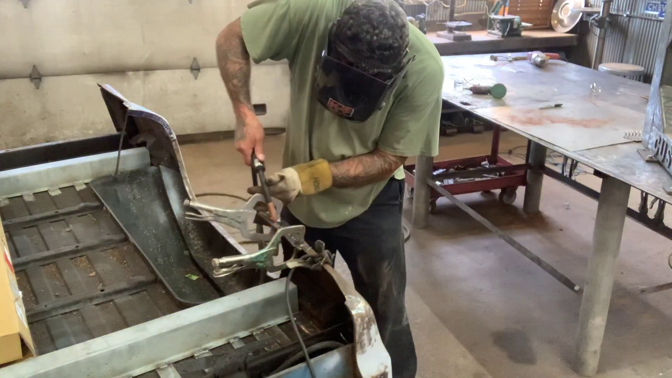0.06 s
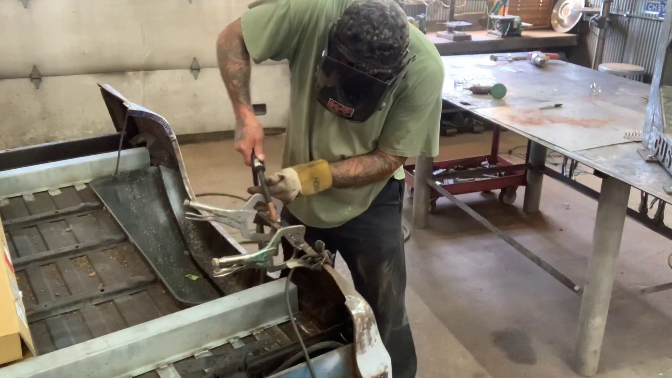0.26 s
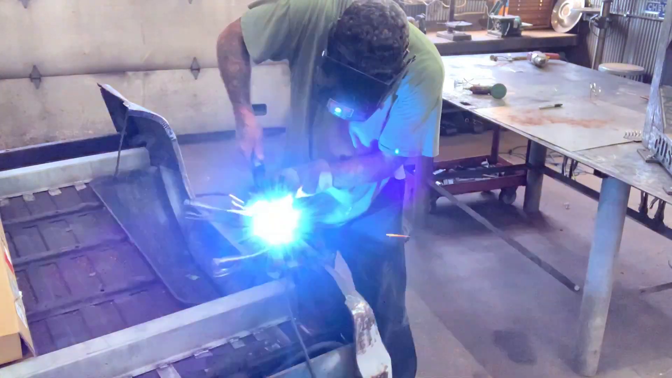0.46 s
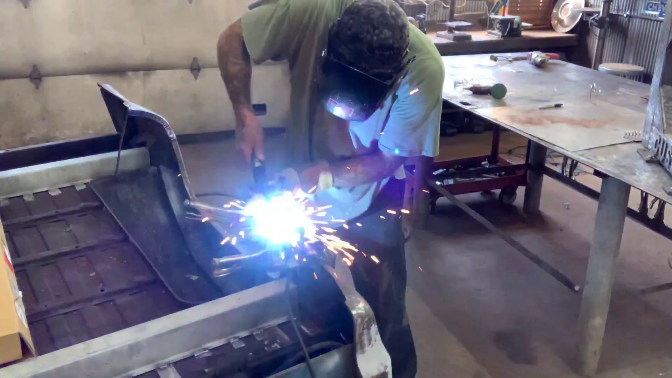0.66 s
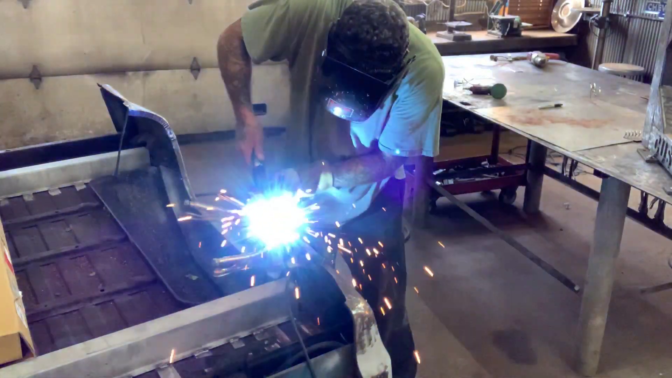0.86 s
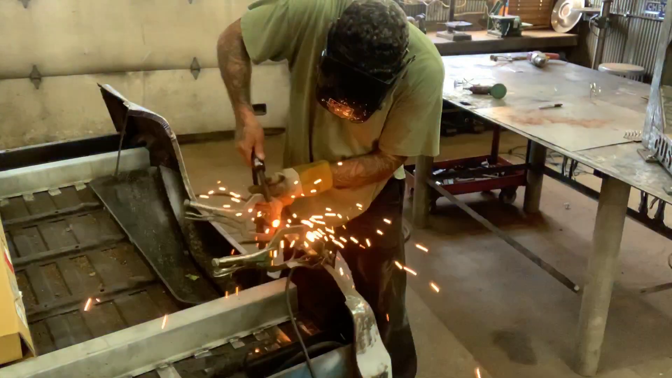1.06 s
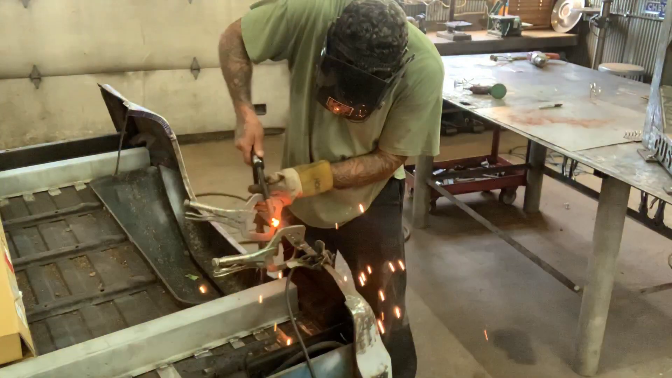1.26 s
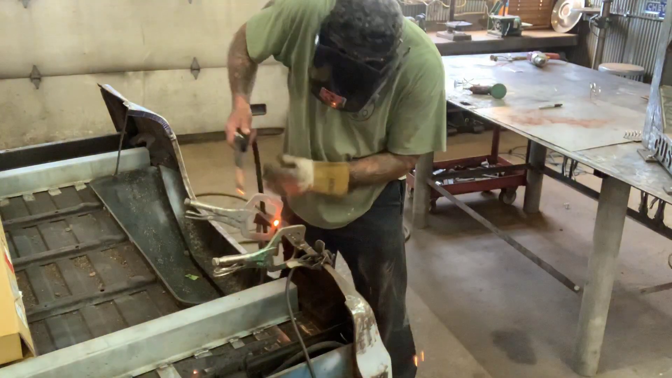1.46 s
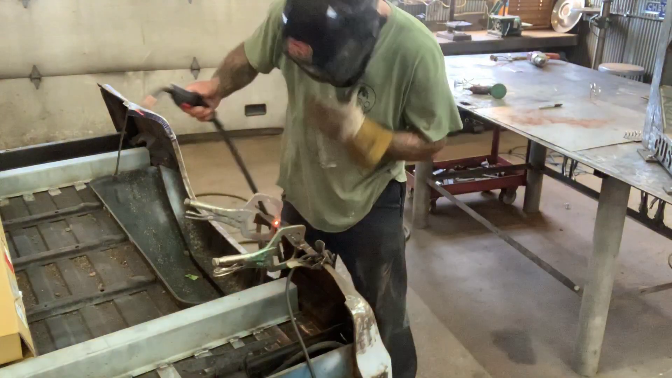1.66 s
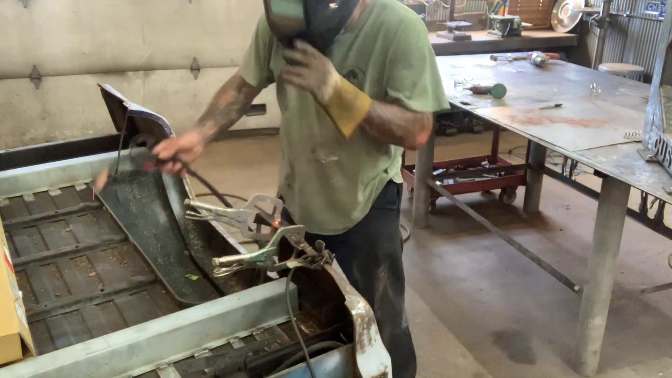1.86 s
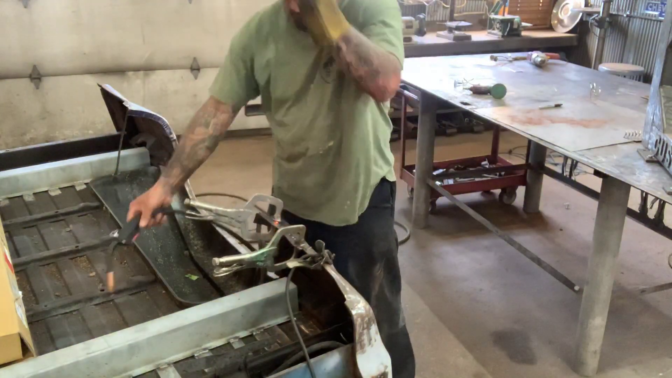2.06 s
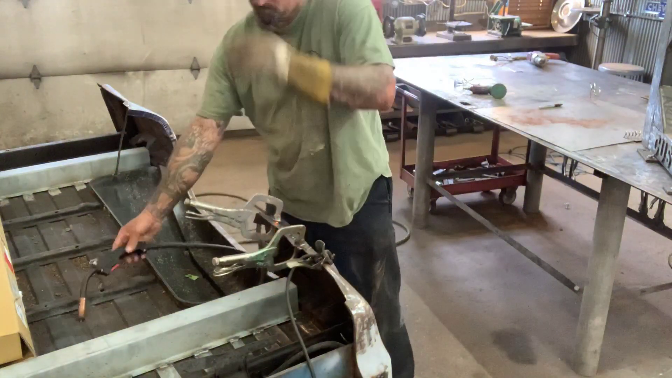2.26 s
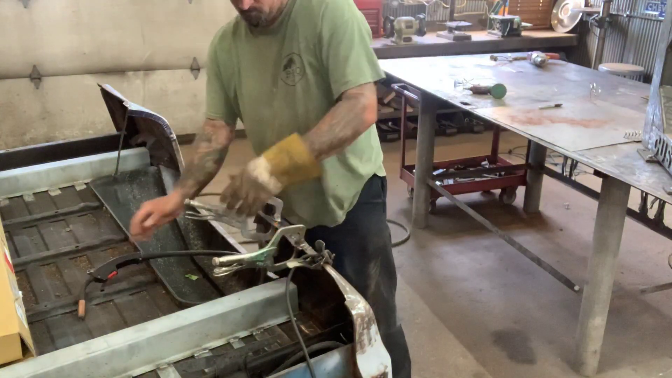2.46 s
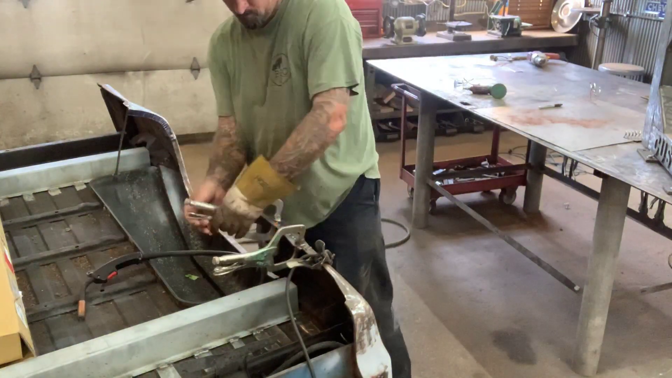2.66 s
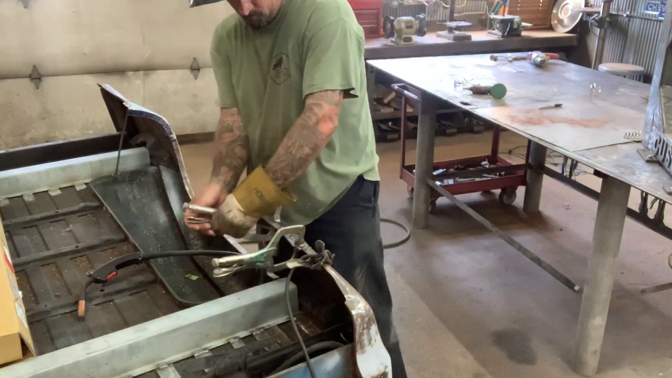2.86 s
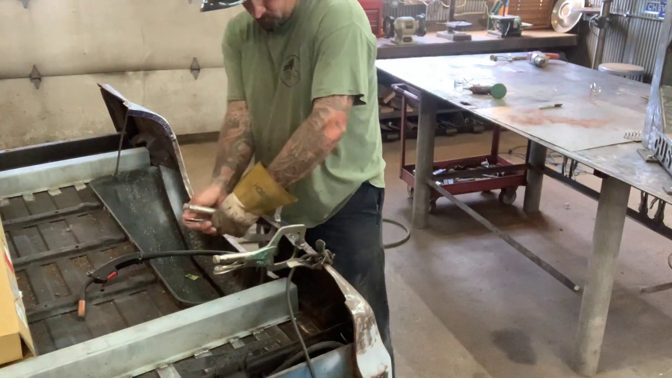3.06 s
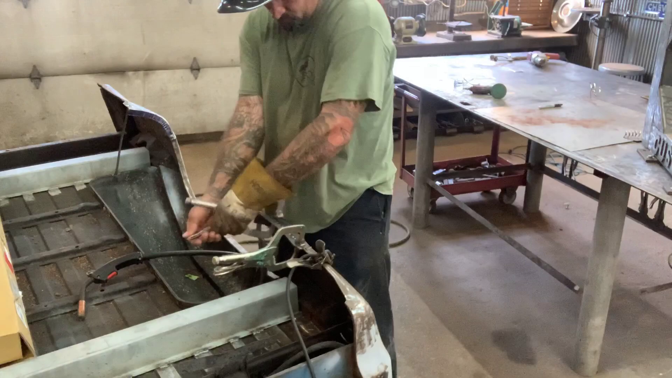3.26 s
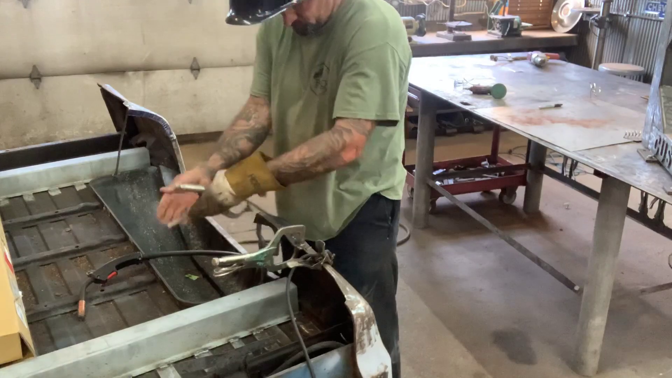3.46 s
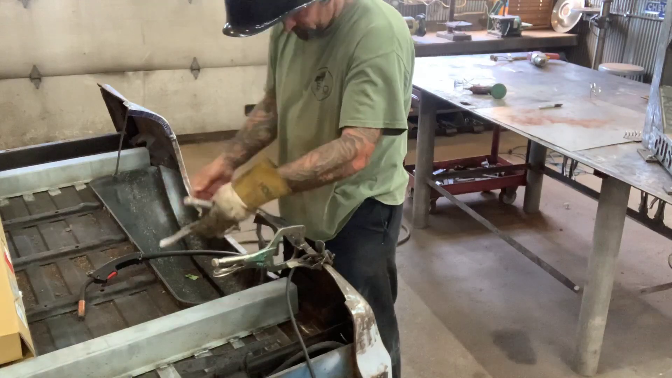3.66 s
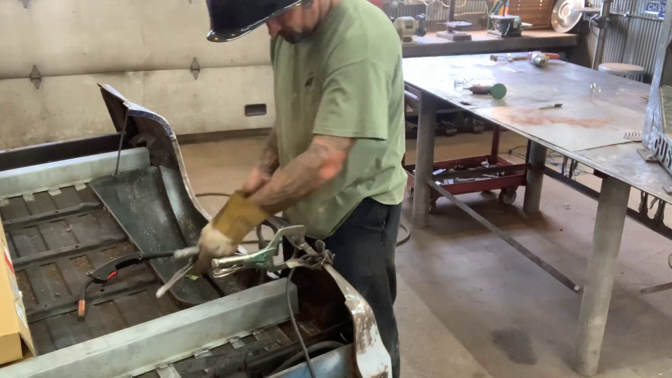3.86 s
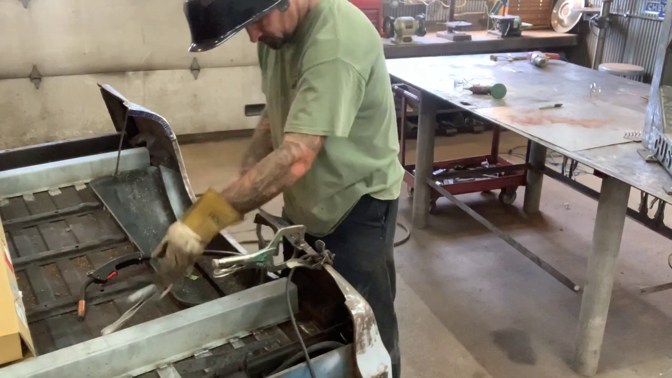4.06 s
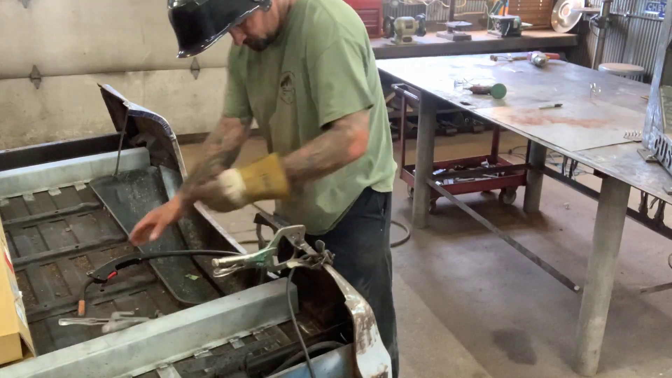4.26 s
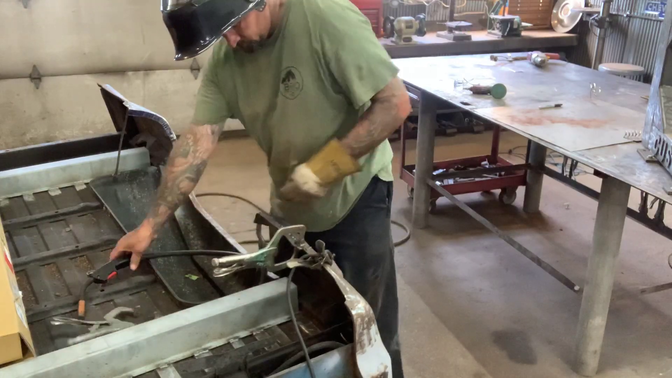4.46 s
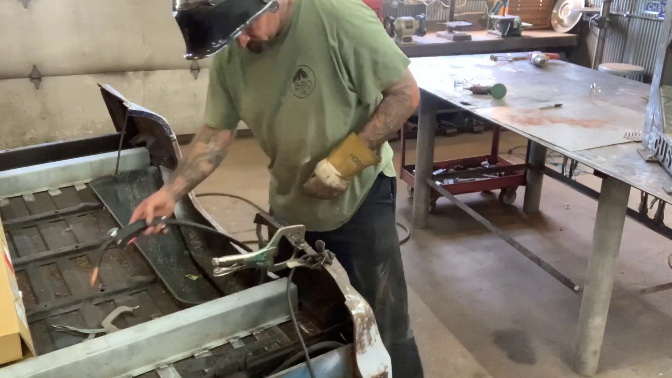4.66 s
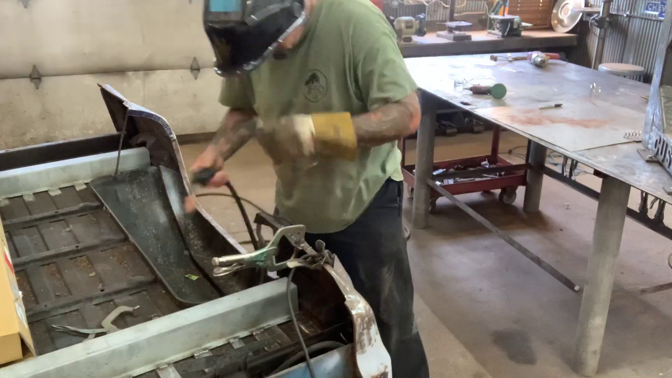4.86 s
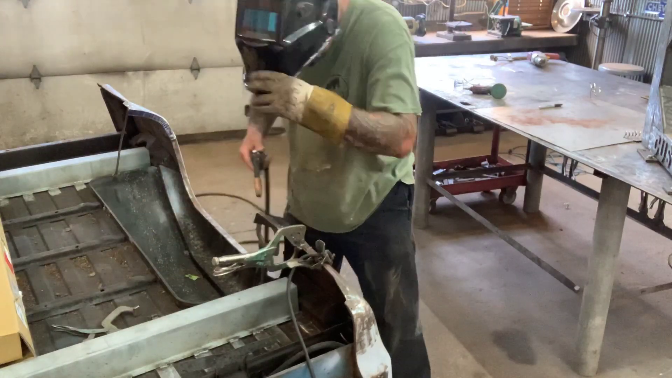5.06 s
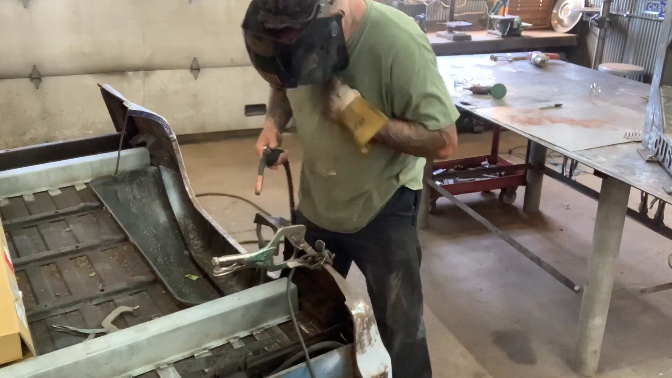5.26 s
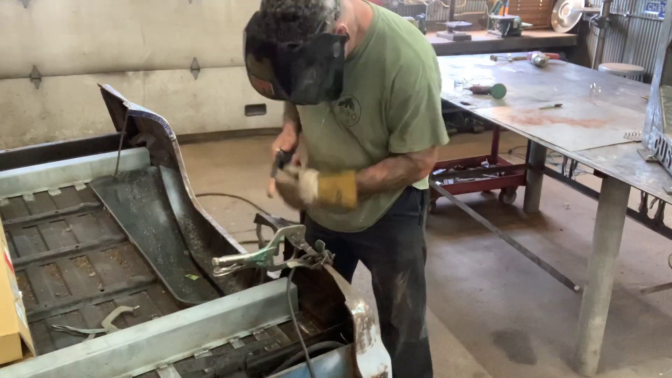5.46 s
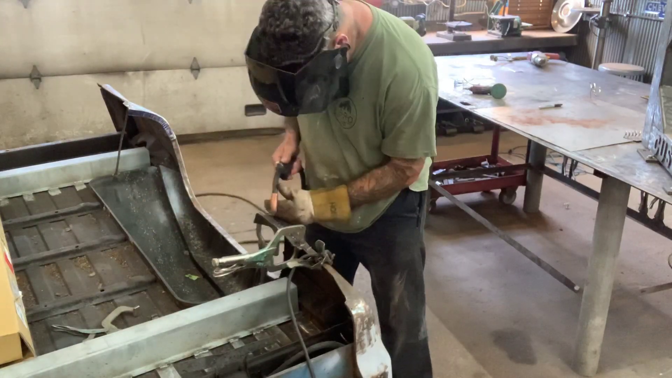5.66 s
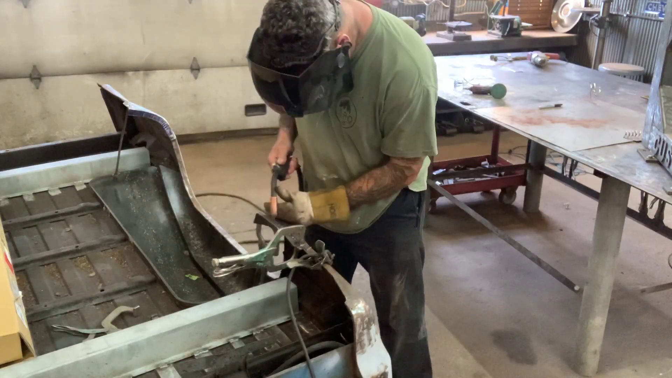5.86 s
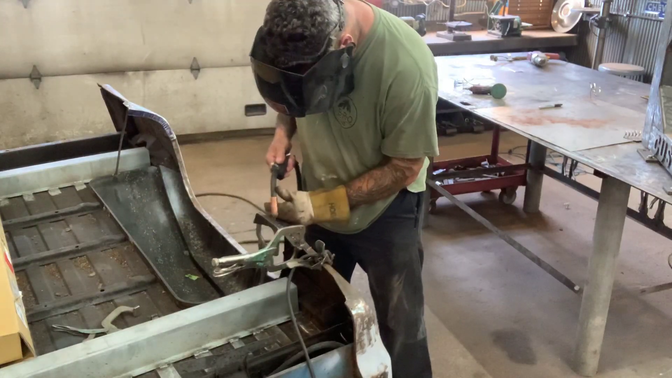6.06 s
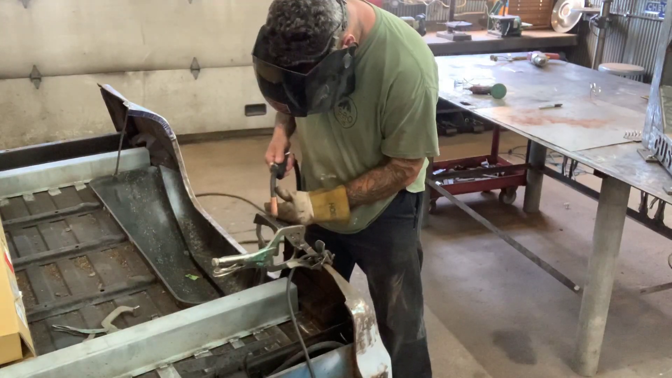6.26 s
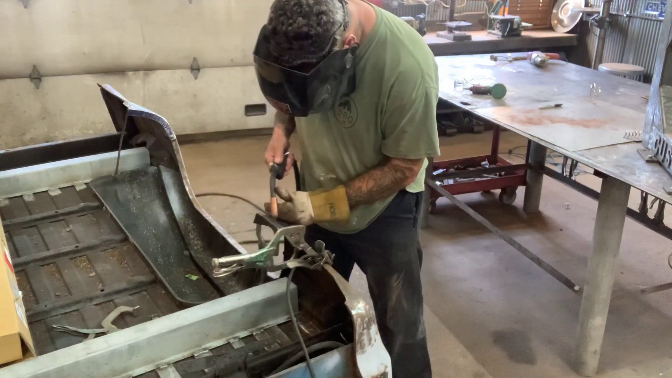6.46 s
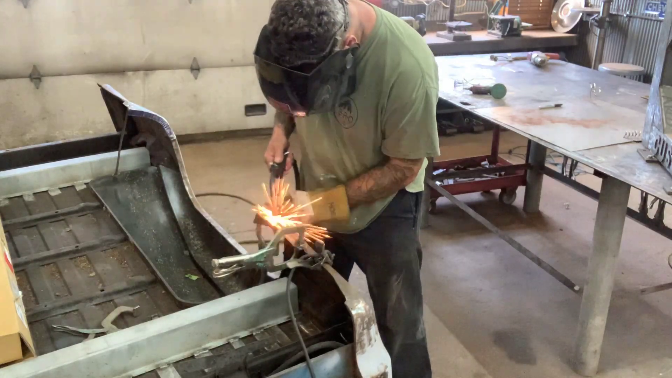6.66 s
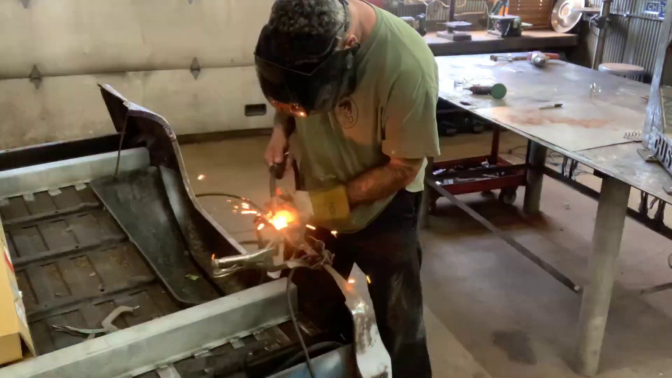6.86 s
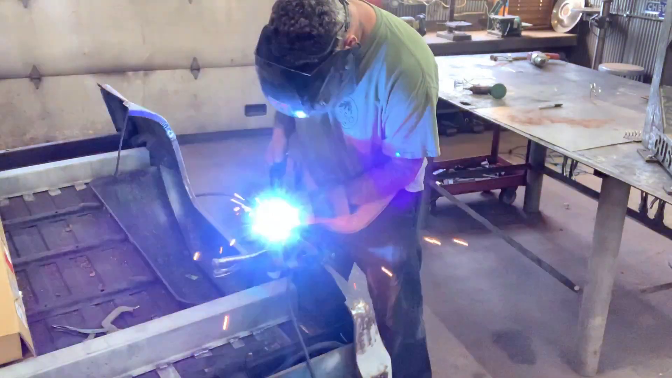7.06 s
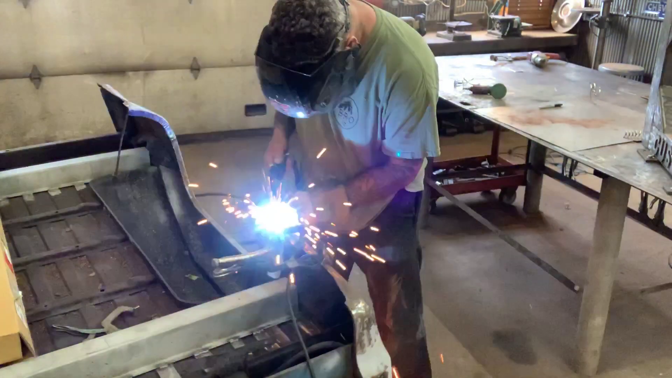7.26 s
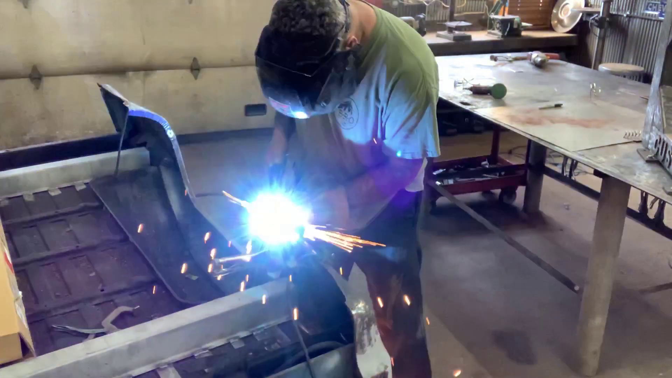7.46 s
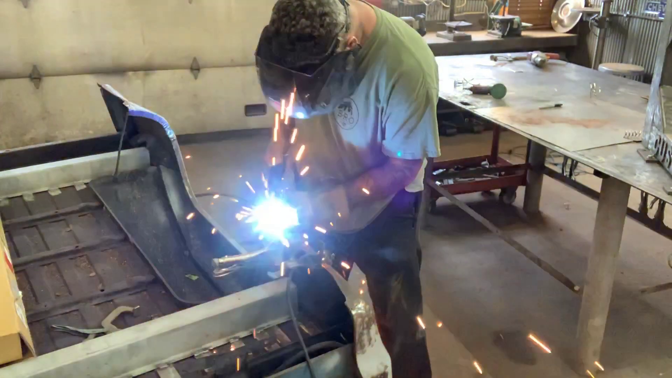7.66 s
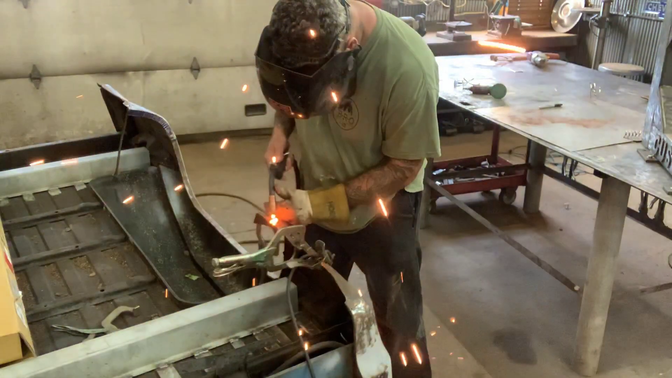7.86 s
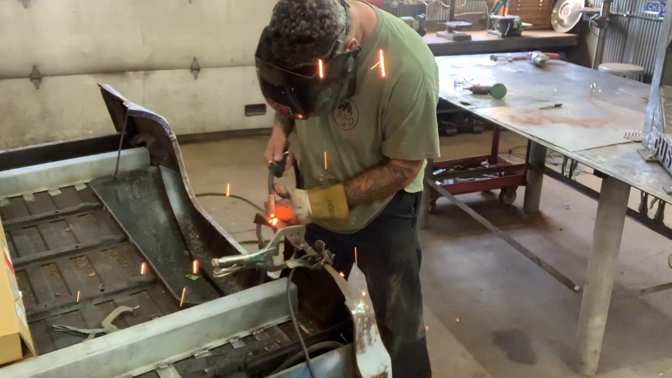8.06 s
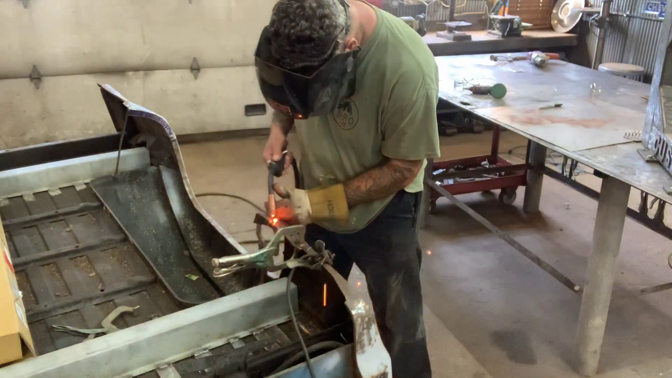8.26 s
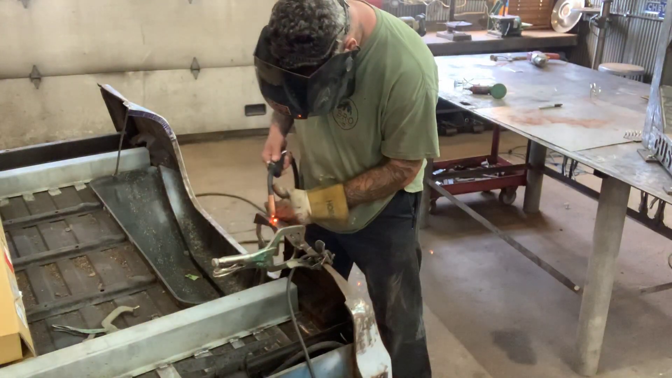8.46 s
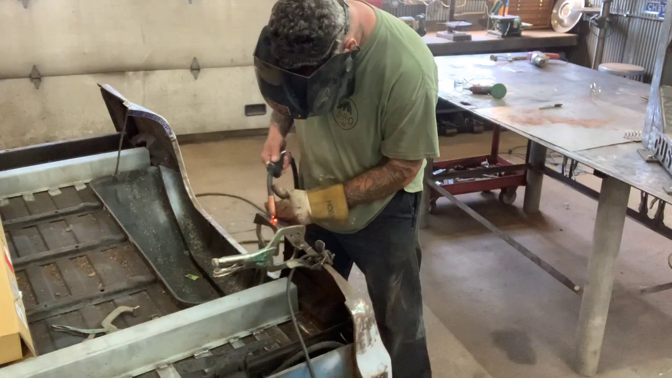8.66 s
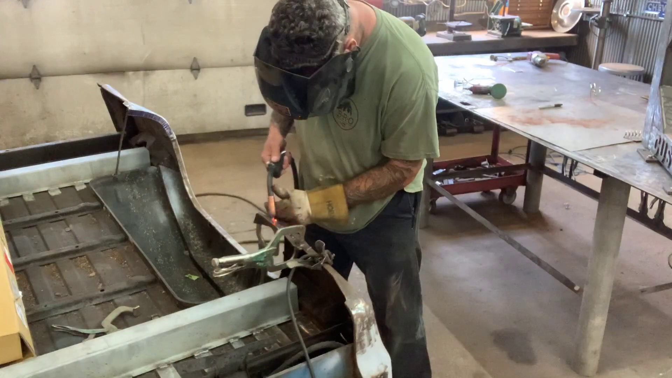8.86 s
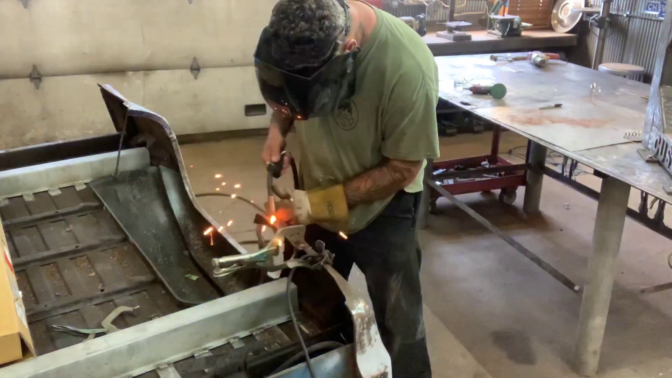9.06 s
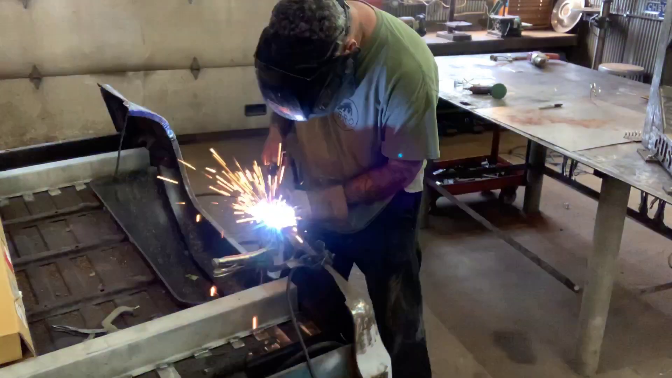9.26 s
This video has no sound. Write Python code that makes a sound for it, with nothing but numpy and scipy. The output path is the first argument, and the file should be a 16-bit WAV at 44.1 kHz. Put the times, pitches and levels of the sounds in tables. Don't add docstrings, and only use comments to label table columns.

```python
import sys
import numpy as np
from scipy import signal
from scipy.fft import rfft, irfft, next_fast_len
from scipy.io import wavfile
from scipy.ndimage import uniform_filter1d, map_coordinates

SR = 44100
rng = np.random.default_rng(int(sys.argv[2]) if len(sys.argv) > 2 else 0)


def volts(x):
    e = np.asarray(x, float) / 20
    return 10 ** e


def to_wav(sig):
    pcm = np.clip(np.atleast_2d(sig), -1, 1) * 32767
    pcm = np.round(pcm).astype(np.int16)
    wavfile.write(sys.argv[1], SR, pcm.T)


N = 411012
T = np.arange(N) / SR

# freq_hz, level_db_per_hz
SWAY_COLOUR = [(15, -49.5), (25, -32), (36, -15), (48, -2.5), (108, 5), (170, -1.5), (220, -29.5),
               (370, -120)]
# peak_s, level_db
SWAY_SWELLS = [(1.0, -70), (1.71, -72), (2.46, -47.5), (3.38, -53.5), (3.9, -64), (4.28, -44), (4.57, -50),
               (4.95, -49), (5.6, -62), (6.1, -66.5), (6.85, -58.5), (7.17, -58.5), (9.09, -64)]
SWAY_STILL_DB = -77.5
# freq_hz, level_db_per_hz
FAN_AIR = [(25, -86.5), (82, -65), (140, -37), (182, -16), (211, -16.5), (245, 0), (318, -21), (349, -24),
           (369, -26.5), (516, -26), (633, -30.5), (748, -27), (1150, -33.5), (12000, -65.5), (15600, -106),
           (22000, -120)]
BLADE_HZ, BLADE_DB, AIR_WOBBLE_DB = 240.5, -52.5, 0.7
# freq_hz, likeness_ratio
FIELD_ALIKE = [(60, 0.97), (300, 0.7), (640, 0.15), (1400, -0.028), (3000, 0.041), (8000, 0.16)]
# freq_hz, t60_s
HALL_DECAY = [(80, 1.3), (400, 2.6), (1100, 1.68), (3000, 1.55), (8000, 1.16), (15000, 0.4)]
HALL_TOP_HZ = 15900

# start_s, peak_db, weight_db, hardness_db, t60_s
TORCH_DROPS = [
    (2.272, -16, -13, 3, 0.32),
    (2.299, -25.5, -11, -5, 0.57),
    (2.455, -26.5, -6, 15.5, 0.23),
    (2.57, -36.5, 1.5, 11, 0.39),
]
# freq_hz, level_db_per_hz
TORCH_BLOW = [(18, -61), (30, -69), (104, -5), (146, -10), (206, -3.5), (455, -17.5), (562, -10.5),
              (1000, -8), (1380, -9), (1490, -10), (4200, -28.5), (5400, -38.5), (8300, -39), (10300, -45),
              (13000, -43.5), (16500, -86.5)]
# start_s, peak_db, weight_db, hardness_db, t60_s
PLIER_DROPS = [(3.14, -41.5, -28, 31.5, .1), (3.152, -26.5, -16.5, -3, 0.48), (3.299, -41.5, -5, 0, 0.4),
               (4.074, -20.5, -41, 9.5, 0.46), (4.153, -8.5, -10, 10.5, 0.21),
               (4.209, -12, -8.5, -11.5, 0.32), (4.297, -11, -25, -18, 0.14),
               (4.465, -22.5, -17, 0.5, 0.18), (4.498, -25.5, -15, -14.5, 1), (4.544, -35, -26, 14.5, .15),
               (4.553, -16, -26, 5, .2), (4.563, -8, -19.5, 2.5, 0.18), (4.574, -11, -25, 1, 0.4),
               (4.659, -21, -27, -2.5, 0.15), (4.719, -23, -23, -12, 0.98)]
# freq_hz, level_db_per_hz
PLIER_BLOW = [(18, -48), (30, -45.5), (109, -12.5), (210, -6.5), (276, -9.5), (340, -2.5), (443, -8.5),
              (519, -8), (1120, -12), (1210, -17.5), (4000, -20), (8750, -24.5), (10500, -29), (13000, -31),
              (14800, -36), (16500, -114)]
# mode_hz, level_db, t60_s
BED_MODES = [(213, -11.5, 0.086), (365, -19, 0.13), (518, -5, 0.15), (770, -24, 0.098), (1191, -12, 0.29),
             (1404, -15.5, 0.42), (2080, -23.5, 0.24), (2740, -16, 0.054), (3530, -8, 0.12),
             (6000, -31.5, .15)]
# freq_hz, likeness_ratio
BED_ALIKE = [(60, 1), (300, 0.61), (640, 0.27), (1400, .2), (4000, .2), (8000, .7), (13000, 0.33)]
LUMPY_DB, MODE_SCATTER_DB = 2, 2.5
# start_s, peak_db, pitch_hz, t60_s
HANDLE_RINGS = [(4.077, -31, 1080, .3), (4.112, -30, 341, .5), (4.156, -24.5, 750, .2),
                (4.16, -22, 1290, .12), (4.297, -21.5, 1050, 0.17), (4.565, -27.5, 1020, 0.066),
                (4.078, -35.5, 2600, 0.33), (4.078, -37, 3390, .2), (4.297, -27.5, 3570, .1),
                (4.467, -33, 3500, .15), (4.575, -22, 4460, 0.13), (4.575, -37.5, 1766, 0.2),
                (4.576, -30, 3980, .1), (4.59, -28, 356, 0.61), (2.275, -28.5, 1270, .1),
                (3.152, -34.5, 1581, .11), (3.154, -42.5, 3240, 0.12), (3.153, -45.5, 6210, .1)]
# start_s, peak_db, crack_hz, width_hz
JAW_TICKS = [
    (3.299, -60.5, 13000, 4000),
    (3.329, -56, 13000, 4000),
    (3.649, -53.5, 6650, 2986),
    (3.776, -45, 9000, 8130),
]
# mode_hz, level_db, t60_s
JAW_MODES = [(11600, -0.5, 0.27), (14400, -12, .25)]

# start_s, peak_db, pitch_hz, t60_s
WIRE_STUBS = [
    (0.855, -29.5, 71, 0.084),
    (6.834, -18.5, 70, 0.036),
    (7.35, -19, 68, 0.044),
]
# valve_open_s, arc_death_s, valve_shut_s, duck_db
WELDS = [
    (0.46, 1.04, 1.92, 8),
    (6.553, 7.72, 8.585, 7),
    (8.796, 9.5, 10.5, 2.5),
]
DUCK_S, RECOVER_S = 0.41, 0.67
# start_s, peak_db, body_db
VALVE_CLICKS = [
    (0.4548, -35, -13.5),
    (1.919, -27.5, -16),
    (6.554, -25.5, -16),
    (8.5849, -26.5, -16),
    (8.795, -29, -17),
]
# delay_s, level_db
PLUNGER_BOUNCES = [(.0006, -1), (.0027, 1), (.005, -9.5)]
# freq_hz, level_db_per_hz
JET_COLOUR = [(880, -20), (1500, -30), (2700, -29.5), (3520, -19.5), (4600, -22), (5400, -12.5), (8940, 1),
              (9590, -4), (10600, 0), (11200, 4.5), (12300, -9), (13900, 1), (15000, -4), (15900, -47)]
FLOW_DB, SURGE_DB, SURGE_S, SHUT_DB_PER_S = -51.5, 14.5, 0.04, 160
# time_s, hiss_db
ARC_HEAT = [
    [(.455, -35.5), (.52, -39.5), (.7, -34.5), (.8, -32), (.9, -35), (1.02, -40), (1.2, -51), (1.4, -80)],
    [(6.6, -46.5), (6.72, -34.5), (6.84, -41.5), (7.06, -39.5), (7.16, -37), (7.3, -43), (7.44, -42),
     (7.72, -39.5), (8.01, -59.5)],
    [(8.84, -54), (8.9, -45), (8.97, -51), (9.08, -49), (9.2, -45), (9.32, -37)],
]
# freq_hz, level_db_per_hz
DRIVE_COLOUR = [(290, -20), (500, -4.5), (542, -37), (715, -3), (835, -34.5), (1150, 1), (1410, 0),
                (1680, -21.5), (3500, -33.5), (4550, -47), (7700, -120)]
FEED_DB, COAST_DB = -63, -62.5
# peak_s, level_db
DRIVE_PUSHES = [(.56, -47), (.8, -63), (6.73, -52), (6.95, -53), (7.16, -46), (7.44, -80), (8.89, -47.5),
                (8.97, -44)]

SECOND_JOINT_S = 4
LEFT_LAG_S = 9 / SR
# freq_hz, phase_rad
PORT_PHASE = [(300, -.4), (1000, -1.7), (2000, -3.6), (4000, -7.3), (5500, -9.6), (6200, -12.1),
              (6900, -13.4), (8000, -15.8), (9000, -17.3), (9650, -15.9), (10300, -16.05), (11000, -17.3),
              (11700, -16.8)]
# freq_hz, difference_db
PORT_BALANCE = [(500, 0), (1000, 3), (3000, 2), (5000, 0), (7000, 0), (8500, -4), (9700, 3.5), (10500, -1),
                (12000, 0)]
GRIT_PER_S, GRIT_DB, GRIT_SPREAD_DB, GRIT_TOP_HZ = 900, 4, 1.5, 14500
# peak_s, level_db
SIZZLES = [(6.829, -31.5), (6.903, -46), (6.973, -43), (7.12, -40.5), (7.344, -41), (7.478, -39.5),
           (7.605, -47), (8.966, -51.5), (9.221, -40)]
# delay_s, level_db
WALL_RETURNS = [(.0168, -22), (.0186, -15), (.0214, -13), (.0226, -19), (.0288, -20), (.0309, -16)]
# freq_hz, level_db
WALL_TILT = [(900, 14), (2500, 18), (4500, 14.5), (6500, 4), (8500, -15), (14000, 0), (15600, -31)]
SHIVER_DB, SHIVER_T60_S = -9, 0.035
# start_s, peak_db, knock_db
LONE_POPS = [(.4635, -16.5, -12), (.47, -17, -17), (.4821, -23, -23), (.5315, -13.5, -15),
             (.7527, -14, -22), (.7628, -14, -22), (6.6812, -12, -17), (6.7625, -18, -20),
             (6.832, -14, -12), (6.904, -24, -21), (6.9753, -11, -18), (7.0282, -13, -20),
             (7.0678, -26, -16), (7.1187, -24, -18), (7.1226, -13, -14), (7.1454, -13, -18),
             (7.2901, -17, -18), (7.3469, -12, -15), (7.481, -13, -15), (7.608, -9, -20),
             (7.6668, -11.5, -22), (7.6989, -9.5, -21), (8.9317, -24, -11), (8.9401, -30, -15),
             (8.9678, -18, -21), (9.0215, -13, -20), (9.0521, -32, -17), (9.1099, -15, -21),
             (9.2231, -13, -14), (9.2915, -19, -18)]
# start_s, peak_db
RUN_1 = [(0.5441, -17.0), (0.5507, -16.0), (0.5563, -16.0), (0.5656, -16.0), (0.5725, -15.0),
         (0.5805, -16.0), (0.5871, -16.0), (0.5925, -15.0), (0.6038, -17.0), (0.6086, -14.0),
         (0.623, -15.0), (0.6298, -17.0), (0.6381, -16.0), (0.6443, -17.0), (0.6527, -16.0),
         (0.6602, -17.0), (0.67, -17.0), (0.6763, -17.0), (0.6842, -16.0), (0.6921, -16.0), (0.7006, -15.0),
         (0.709, -15.0), (0.7175, -13.0), (0.725, -15.0)]
RUN_2 = [(0.784, -15.0), (0.7917, -18.0), (0.8012, -15.0), (0.8105, -17.0), (0.819, -15.0), (0.8299, -12.0),
         (0.8359, -16.0), (0.8417, -16.0), (0.8478, -16.0), (0.8585, -18.0), (0.8643, -17.0),
         (0.8697, -15.0), (0.875, -19.0), (0.882, -17.0), (0.8914, -18.0), (0.8982, -16.0), (0.9094, -19.0),
         (0.9172, -16.0), (0.9267, -18.0), (0.9314, -15.0), (0.9407, -18.0), (0.9467, -13.0),
         (0.9524, -15.0), (0.9571, -22.0), (0.9632, -23.0), (0.9746, -19.0), (0.9805, -20.0),
         (0.9904, -17.0), (0.9991, -22.0), (1.0093, -18.0), (1.0191, -18.0), (1.0294, -17.0),
         (1.041, -22.0)]
RUN_3 = [(7.1627, -11.0), (7.1736, -13.0), (7.1808, -14.0), (7.1883, -12.0), (7.1946, -13.0), (7.2, -11.0),
         (7.2076, -13.0), (7.2154, -15.0), (7.2227, -14.0), (7.2306, -11.0), (7.2399, -11.0),
         (7.2505, -14.0)]
RUN_4 = [(7.5007, -12.0), (7.5104, -13.0), (7.5213, -17.0), (7.5295, -14.0), (7.5373, -16.0),
         (7.5447, -18.0), (7.5516, -20.0), (7.5579, -19.0)]
RUN_5 = [(9.2444, -13.0), (9.2523, -19.0), (9.2637, -13.0), (9.2733, -16.0), (9.2819, -17.0)]
# lift_db, knock_db
RUN_LEVELS = [(5, -24.5), (3.5, -26), (0, -20.5), (-0.5, -19.5), (1, -19.5)]
KNOCK_SCATTER_DB = 1
# freq_hz, level_db_per_hz
SPARK_COLOURS = [
    [(1760, -28.5), (2600, -25.5), (3560, -4.5), (4380, -15.5), (6480, -4.5), (7910, -8), (8870, 1),
     (10400, 3.5), (13900, 0.5), (16000, 2), (16500, -33)],
    [(1760, -45), (3000, -21.5), (3660, -24.5), (3960, -16.5), (6960, -8.5), (8560, 2), (10800, 2.5),
     (11900, -6), (14100, -0.5), (15200, -4.5), (16000, -16), (16500, -31.5)],
]
# delay_s, level_db, top_hz
SPARK_ECHOES = [
    [(.0004, -4, 15870), (.0009, -6.5, 13900), (.0016, -13, 14650), (.003, -18.5, 5000)],
    [(.0012, -19.5, 6000), (.0015, -5.5, 13970), (.0032, -15, 14300)],
]
# share_ratio, t60_s
SPARK_TAILS = [(.45, .0022), (.07, .001)]
# mode_hz, width_hz, level_db
KNOCK_MODES = [
    [(1190, 950, 10.5), (3500, 1600, 3)],
    [(1700, 2150, 6), (4000, 660, -26.5)],
]
# delay_s, level_db
KNOCK_REBOUNDS = [(.0007, -36.5), (.0009, 4.5)]
WELDING_LOW_HZ = 120


def unit(x):
    return x / np.sqrt(np.mean(x ** 2) + 1e-20)


def along(points, hz):
    f, v = np.transpose(points)
    return np.interp(np.log(hz + 1), np.log(f + 1), v)


def curves(rows):
    s, *cols = np.transpose(rows)
    return [np.interp(T, s, c, left=-120, right=-120) for c in cols]


def wobble(rate_hz):
    knots = rng.standard_normal(int(N * rate_hz / SR) + 4)
    return map_coordinates(knots, [T * rate_hz])


def swells(rows, rise_db_per_s, fall_db_per_s):
    power = 0
    for s, db in rows:
        away_db = np.maximum(rise_db_per_s * (s - T), fall_db_per_s * (T - s))
        power = power + volts(db - away_db) ** 2
    return np.sqrt(power)


def filtered(x, response):
    m = next_fast_len(x.shape[-1] + SR // 8)
    return irfft(rfft(x, m) * response(np.fft.rfftfreq(m, 1 / SR)), m)[..., :x.shape[-1]]


def resonances(modes):
    def response(f):
        total = 0
        for k, (hz, width_hz, db) in enumerate(modes):
            loss = 1j * f * width_hz
            total = total + (-1) ** k * volts(db) * loss / (hz * hz - f * f + loss)
        return total
    return response


def causal(spectrum, size=2048):
    level_db = along(spectrum, np.fft.rfftfreq(size, 1 / SR))
    cepstrum = irfft(np.log(volts(level_db) + 1e-6))
    cepstrum[1:size // 2] *= 2
    cepstrum[size // 2 + 1:] = 0
    pulse = irfft(np.exp(rfft(cepstrum)))[:size // 2]
    return pulse / np.abs(pulse).max()


def diffuse(pair, db_at, alike=FIELD_ALIKE):
    def mid_side(hz):
        turn_rad = np.arccos(np.clip(along(alike, hz), -1, 1)) / 2
        return volts(db_at(hz)) * np.array([np.cos(turn_rad), np.sin(turn_rad)])
    mid, side = filtered(pair, mid_side)
    return np.array([mid + side, mid - side])


def dying(t60_at, size):
    hz, t, z = signal.stft(rng.standard_normal((2, size)), SR, nperseg=256)
    decay = volts(-60 * t / t60_at(hz)[:, None])
    return signal.istft(z * decay, SR, nperseg=256)[1][:, :size]


def dull(x, top_hz):
    return filtered(x, lambda hz: 1 / (1 + 1j * hz / top_hz) ** 2)


def from_torch(x):
    sides = np.array([[0.5], [-0.5]])

    def ports(hz):
        lead_rad = 2 * np.pi * hz * LEFT_LAG_S + along(PORT_PHASE, hz)
        return np.exp(-1j * lead_rad * sides) * volts(along(PORT_BALANCE, hz) * sides)
    return filtered(x, ports)


def add(track, s, sound):
    start = round(s * SR)
    part = track[..., start:start + sound.shape[-1]]
    part += sound[..., :part.shape[-1]]


def ducked_db():
    total_db = 0
    for on, dies, _, db in WELDS:
        total_db = total_db - db * np.interp(T, [on, on + DUCK_S, dies, dies + RECOVER_S], [0, 1, 1, 0])
    return total_db


def rumble():
    sway = diffuse(rng.standard_normal((2, N)), lambda hz: along(SWAY_COLOUR, hz))
    swell = swells(SWAY_SWELLS, rise_db_per_s=103, fall_db_per_s=26)
    return volts(3.0) * np.hypot(volts(SWAY_STILL_DB), swell) * unit(sway)


def fan():
    turbulence = 1 + 0.25 * (wobble(24) + 1j * wobble(24))
    tone = turbulence * np.exp(2j * np.pi * BLADE_HZ * T + 0.5j * wobble(1.99))
    off_tone_db = lambda hz: along(FAN_AIR, hz) - 8 / (1 + ((hz - BLADE_HZ) / 30) ** 2)
    air = unit(diffuse(rng.standard_normal((2, N)), off_tone_db))
    rush = volts(-1.5 + AIR_WOBBLE_DB * wobble(6.6)) * air
    return volts(BLADE_DB + ducked_db()) * (unit(tone.real) + rush)


def shop(x):
    wet, hop, t = np.zeros((2, N)), SR // 3, T[:SR]
    for i in range(0, N, hop):
        tail = diffuse(dying(lambda hz: along(HALL_DECAY, hz), size=SR), lambda hz: 0 * hz)
        tail *= (1 - np.exp(-t / 0.0014)) * np.cos(np.pi / 2 * t)
        tail *= 1 + 1.5 * np.exp(-((t - 0.026) / 0.011) ** 2)
        tail /= np.linalg.norm(tail[0])
        add(wet, i / SR, signal.fftconvolve(x[None, i:i + hop], tail, axes=1))
    return wet


def bed(drops, colour, usual_db, clank, rattle, clear_db, pan_db):
    out, t = np.zeros((2, N)), T[:SR // 2]
    slowness = [(100, 4.9), (600, 1.4), (3200, 0.82), (8000, 0.36), (13000, 0.75)]  # freq_hz, t60_ratio
    for s, db, weight_db, hard_db, t60 in drops:
        tilt = [(100, weight_db - usual_db), (600, 0.0096), (1300, 0.0047),
                (3200, clank * hard_db), (9000, rattle * hard_db)]
        noise = dying(lambda hz: t60 * along(slowness, hz), size=len(t))
        lumps = list(zip(np.geomspace(150, 15000, num=48), LUMPY_DB * rng.standard_normal(48)))
        dense = diffuse(noise, lambda hz: along(colour, hz) + along(lumps, hz), BED_ALIKE)
        clear = 0
        for (hz, level_db, ring_s), c in zip(BED_MODES, rng.standard_normal((len(BED_MODES), 3))):
            envelope = volts(level_db + MODE_SCATTER_DB * c[:2, None] - 60 * t / ring_s)
            clear = clear + envelope * np.sin(2 * np.pi * hz * (1 + 0.019 * c[2]) * t)
        early_rms = np.sqrt(np.mean(dense[:, :SR // 20] ** 2))
        blow = dense / early_rms + volts(clear_db) * clear
        fade = (1 - np.exp(-t / 0.0023)) * np.cos(np.pi * t)
        add(out, s, volts(db - 10) * filtered(blow, lambda hz: volts(along(tilt, hz))) * fade)
    return from_torch(out) * volts([[pan_db], [-pan_db]])


def handles():
    out, t = np.zeros(N), T[:SR // 2]
    for s, db, hz, t60 in HANDLE_RINGS:
        shake = unit(uniform_filter1d(rng.standard_normal(len(t)), size=600))
        ring = np.sin(2 * np.pi * hz * t + 0.68 * shake)
        add(out, s, volts(db - 60 * t / t60) * ring * (1 - np.exp(-t / 0.0026)))
    return out


def pliers():
    out, t = np.zeros(N), T[:SR // 3]
    for s, db, crack_hz, width_hz in JAW_TICKS:
        shake = unit(uniform_filter1d(rng.standard_normal((len(JAW_MODES), len(t))), size=120))
        ring = 0
        for (hz, level_db, t60), rough in zip(JAW_MODES, shake):
            ring = ring + volts(level_db - 60 * t / t60) * (0.5 + rough) * np.sin(2 * np.pi * hz * t)
        narrow = resonances([(crack_hz, width_hz, 0)])
        burst = volts(-60 * t / 0.011) * rng.standard_normal(len(t))
        crack = filtered(burst, lambda f: narrow(f) ** 2)
        add(out, s, volts(db) * (volts(9.5) * crack + volts(-13.5) * ring))
    return out


def stubs():
    out, t = np.zeros(N), T[:SR // 4]
    for s, db, hz, t60 in WIRE_STUBS:
        turns = hz * t + 1.6 * (1 - np.exp(-t / 0.0025))
        add(out, s, volts(db - 60 * t / t60) * np.sin(2 * np.pi * turns) * (1 - np.exp(-t / 0.011)))
    return out


def valve():
    out, t = np.zeros(N), T[:SR // 8]
    bounces = 0
    for s, db in PLUNGER_BOUNCES:
        bounces = bounces + volts(db - 60 * np.abs(t - s) / np.where(t > s, 0.007, 0.003))
    rattle_shape = (volts(-60 * t / 0.2) + volts(-28.5 - 60 * t / 0.12)) * (1 - np.exp(-t / 0.00054))
    click_modes = resonances([(7300, 5400, -4.5), (13400, 3800, 1)])
    for s, db, body_db in VALVE_CLICKS:
        noise = rng.standard_normal((3, len(t)))
        rattle = noise[:2] * rattle_shape
        bright = unit(filtered(rattle[0], lambda hz: volts(along(JET_COLOUR, hz))))
        body = unit(filtered(rattle[1], lambda hz: 1 / (1 + (np.log(hz / 800 + 1e-9) / 1.05) ** 4)))
        click = unit(filtered(noise[2] * bounces, click_modes))
        add(out, s, volts(db - 21.0) * (volts(-10) * bright + volts(4.5) * click + volts(body_db + 7) * body))
    return out


def gas():
    flow, feeding = 0, 0
    for on, dies, off, _ in WELDS:
        surge_db = SURGE_DB * np.exp(-np.abs(T - on) / SURGE_S)
        flow = flow + (T > on) * volts(surge_db - SHUT_DB_PER_S * np.maximum(T - off, 0))
        feeding = feeding + 1.0 * ((T > on) & (T < dies))
    heat = sum(volts(curves(rows)[0]) for rows in ARC_HEAT)
    jet = np.hypot(volts(FLOW_DB + ducked_db()) * flow, heat)
    steady_db = COAST_DB + (FEED_DB - COAST_DB) * uniform_filter1d(feeding, size=4000)
    drive = flow * np.hypot(volts(steady_db), swells(DRIVE_PUSHES, rise_db_per_s=146, fall_db_per_s=74.5))
    near = from_torch(filtered(rng.standard_normal(N), lambda hz: volts(along(JET_COLOUR, hz))))
    far = diffuse(rng.standard_normal((2, N)), lambda hz: along(JET_COLOUR, hz))
    whir = diffuse(rng.standard_normal((2, N)), lambda hz: along(DRIVE_COLOUR, hz))
    hiss = unit(unit(near) + volts(2.5) * unit(dull(far, top_hz=5000)))
    return jet * volts(1.01 * wobble(14.0)) * hiss + drive * volts(-3.5 + 6.7 * wobble(2.57)) * unit(whir)


def grit():
    heat = sum(volts(curves(rows)[0]) for rows in ARC_HEAT)
    when, size = rng.random((2, N))
    grains = (when < GRIT_PER_S / SR) * volts(GRIT_DB - GRIT_SPREAD_DB * np.log(size + 0.0011))
    colour = resonances([(1330, 780, 2.3), (2300, 1300, 6.9), (8540, 18000, 7.9)])
    return filtered(heat * grains, lambda hz: colour(hz) * np.exp(-(hz / GRIT_TOP_HZ) ** 10))


def sizzle():
    colour = resonances([(1440, 1400, -2.5), (4000, 2500, -6.5), (8630, 2500, -2), (13500, 2700, -3.5)])
    fizz = filtered(rng.standard_normal(N) * volts(4 * wobble(900)), colour)
    return swells(SIZZLES, rise_db_per_s=609, fall_db_per_s=2994) * unit(fizz)


def answers(x):
    t = T[:SR // 25]
    shiver = rng.standard_normal(len(t)) * volts(-60 * t / SHIVER_T60_S) * (t > 0.0012)
    near = volts(SHIVER_DB) * signal.fftconvolve(x, shiver / np.linalg.norm(shiver))[:N]
    walls = lambda hz: sum(volts(db) * np.exp(-2j * np.pi * hz * s) for s, db in WALL_RETURNS)
    return filtered(near + filtered(x, walls), lambda hz: volts(along(WALL_TILT, hz)))


def short_circuits():
    rows = list(LONE_POPS)
    for run, (lift_db, knock_db) in zip((RUN_1, RUN_2, RUN_3, RUN_4, RUN_5), RUN_LEVELS):
        s, db = np.transpose(run)
        rows += zip(s, db + lift_db, knock_db + KNOCK_SCATTER_DB * rng.standard_normal(len(s)))
    return rows


def arc():
    sparks, blows, t = np.zeros((2, N)), np.zeros((2, N)), T[:64]
    shorts = short_circuits()
    for (s, db, knock_db), rag in zip(shorts, rng.standard_normal((len(shorts), 64))):
        joint = int(s > SECOND_JOINT_S)
        share, t60 = SPARK_TAILS[joint]
        spark = (t == 0) + share * rag * volts(-60 * t / t60)
        spark = spark / np.linalg.norm(np.diff(spark, prepend=0))
        add(sparks[joint], s - 0.0001, volts(db) * spark)
        blows[joint, round(s * SR)] = volts(db + knock_db)

    def echoed(hz, echoes):
        total = 1
        for s, db, top_hz in echoes:
            total = total + volts(db) * np.exp(-2j * np.pi * hz * s) / (1 + 1j * hz / top_hz) ** 2
        return total

    def twice(hz, modes, s, db):
        return resonances(modes)(hz) * (1 + volts(db) * np.exp(-2j * np.pi * hz * s))

    snaps, knocks = 0, 0
    for joint, (snap_db, knock_db) in enumerate([(6, 17), (9, 16)]):
        coloured = signal.fftconvolve(sparks[joint], causal(SPARK_COLOURS[joint]))[:N]
        snaps = snaps + volts(snap_db) * filtered(coloured, lambda hz: echoed(hz, SPARK_ECHOES[joint]))
        struck = filtered(blows[joint], lambda hz: twice(hz, KNOCK_MODES[joint], *KNOCK_REBOUNDS[joint]))
        knocks = knocks + volts(knock_db) * struck
    return snaps, knocks


def scene():
    (snaps, knocks), jaws, clicks = arc(), pliers(), valve()
    torch = grit() + sizzle() - snaps
    steel = bed(TORCH_DROPS, TORCH_BLOW, usual_db=-5.0, clank=0.75, rattle=0.1, clear_db=-14.5, pan_db=0.84)
    steel += bed(PLIER_DROPS, PLIER_BLOW, usual_db=-10.5, clank=0.26, rattle=0.85, clear_db=-1.5, pan_db=1.27)
    steel += from_torch(handles()) * volts([[1.2], [-1.2]])
    sent = volts(2) * dull(torch + volts(-5) * clicks, top_hz=9000)
    sent = sent + volts(-5.5) * knocks + volts(-6.0) * steel[0] + volts(1.0) * jaws
    hall = filtered(shop(sent), lambda hz: hz < HALL_TOP_HZ)
    welding = from_torch(torch + clicks + knocks + answers(snaps)) + gas()
    welding = filtered(welding, lambda hz: hz ** 2 / (hz ** 2 + WELDING_LOW_HZ ** 2))
    return welding + hall + steel + jaws * volts([[1.5], [-1.5]]) + stubs() + fan() + rumble()


def low_pass(x):
    return signal.sosfilt(signal.butter(12, 16640, fs=SR, output="sos"), x)


def record(dry):
    notch_hz, width_hz, depth = 10500, 850, 0.82
    heard = filtered(dry, lambda hz: 1 - depth * np.exp(-((hz - notch_hz) / width_hz) ** 2))
    hiss = filtered(rng.standard_normal(dry.shape), resonances([(13000, 2500, 0)]))
    return low_pass(heard + volts(-90.0) * unit(hiss))


dry = scene()
out = record(dry)
to_wav(out)
```